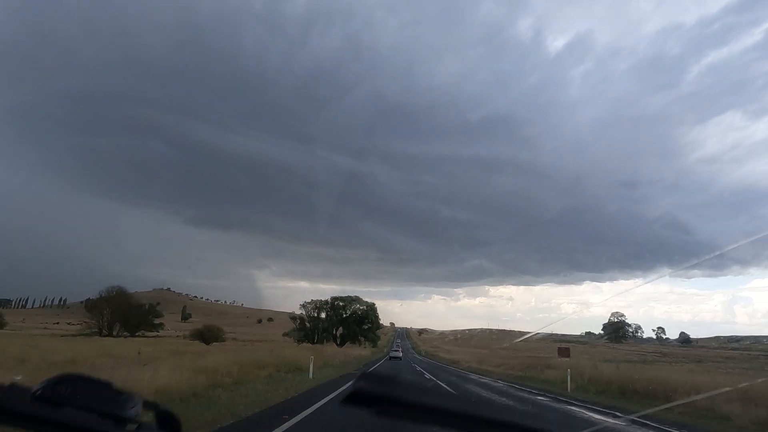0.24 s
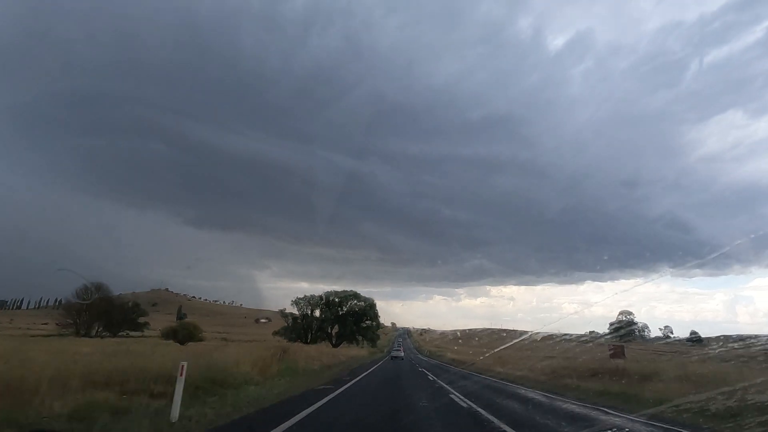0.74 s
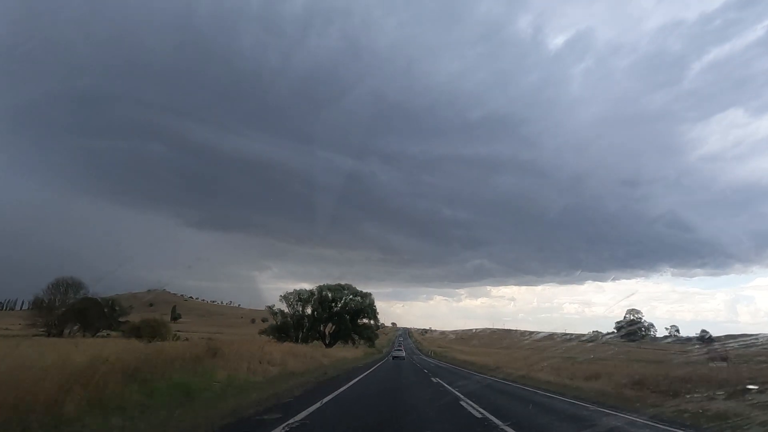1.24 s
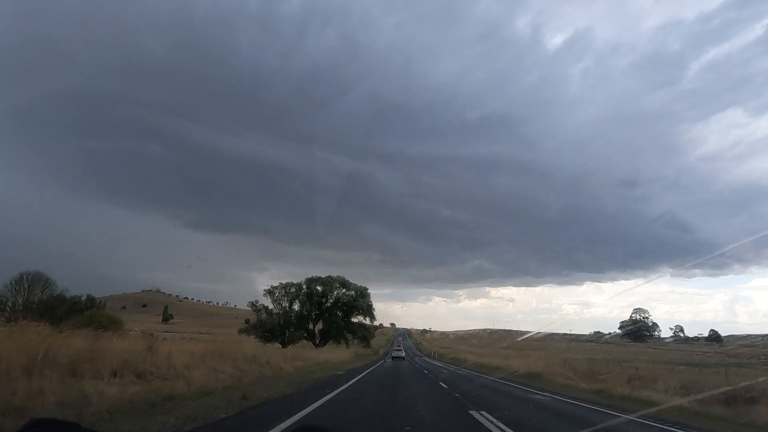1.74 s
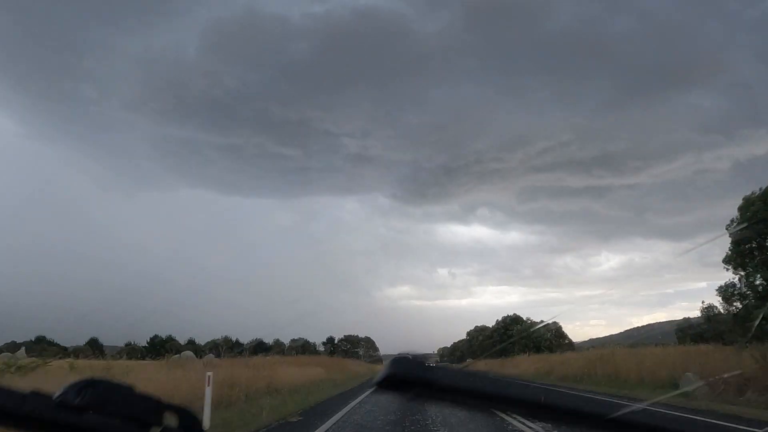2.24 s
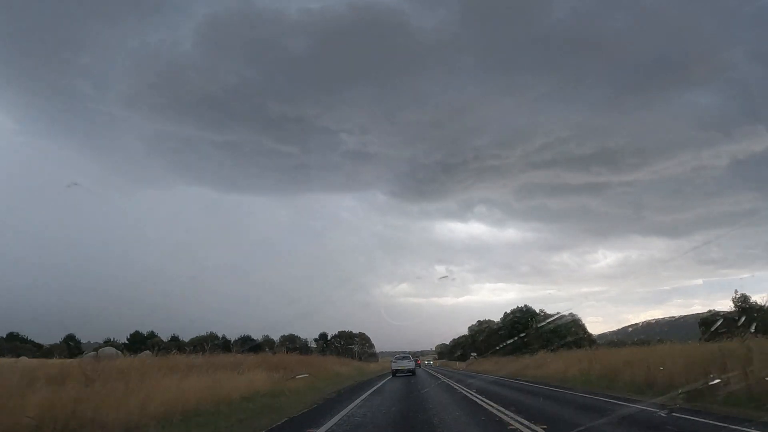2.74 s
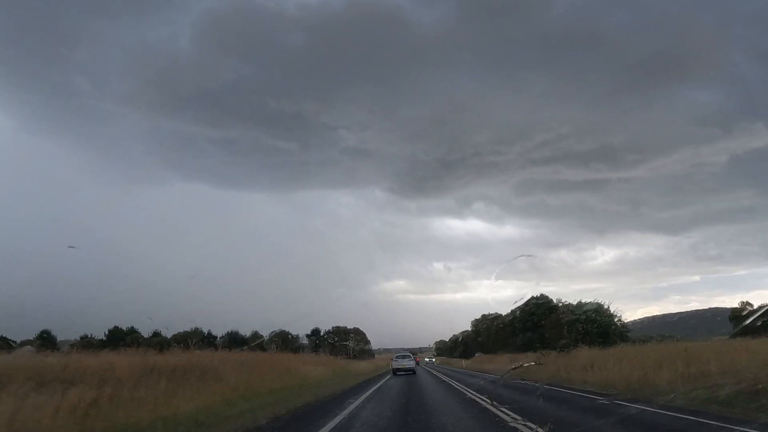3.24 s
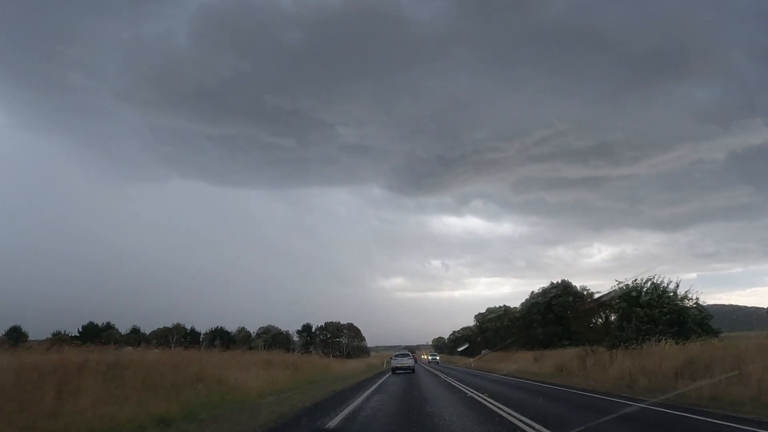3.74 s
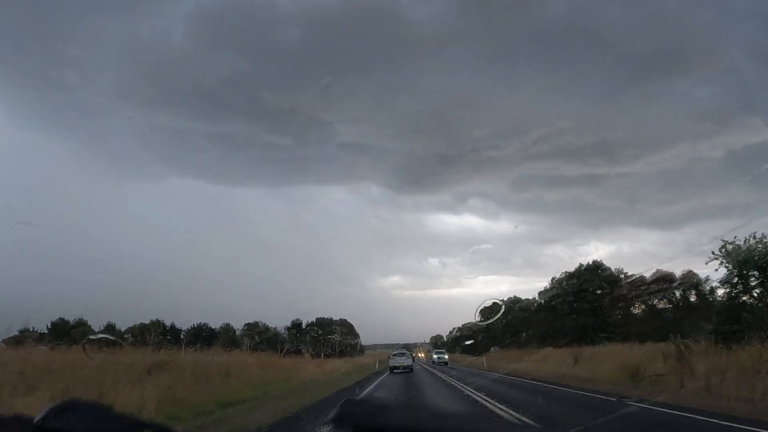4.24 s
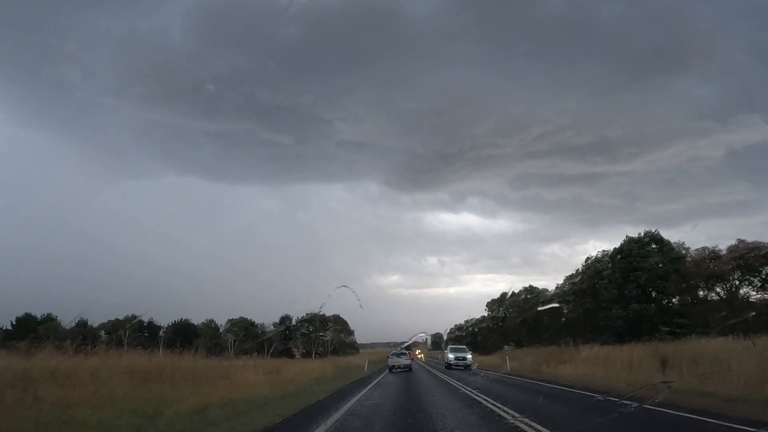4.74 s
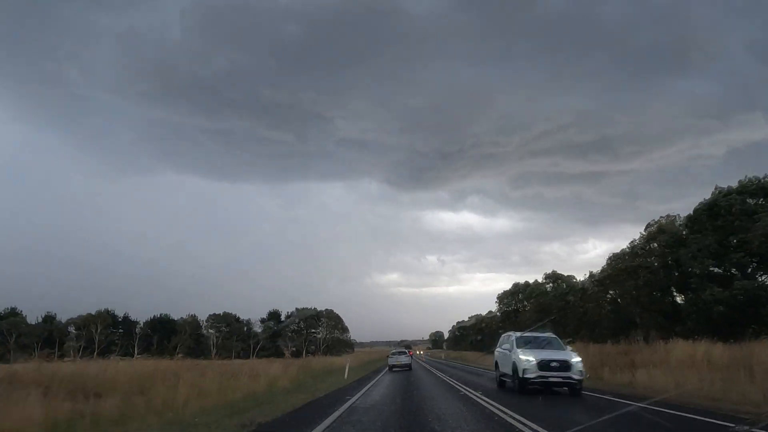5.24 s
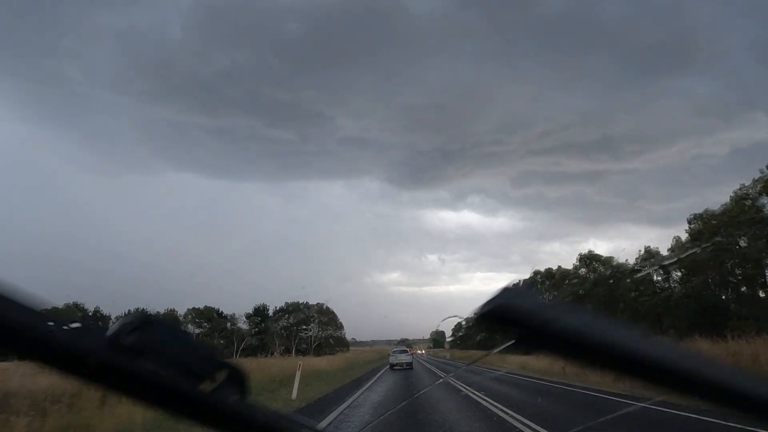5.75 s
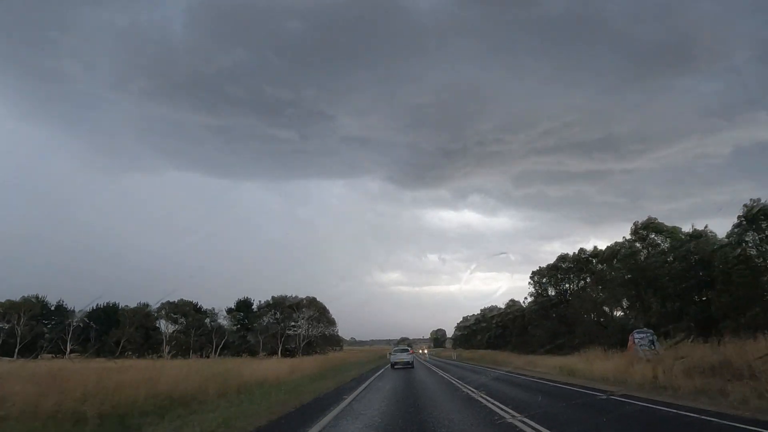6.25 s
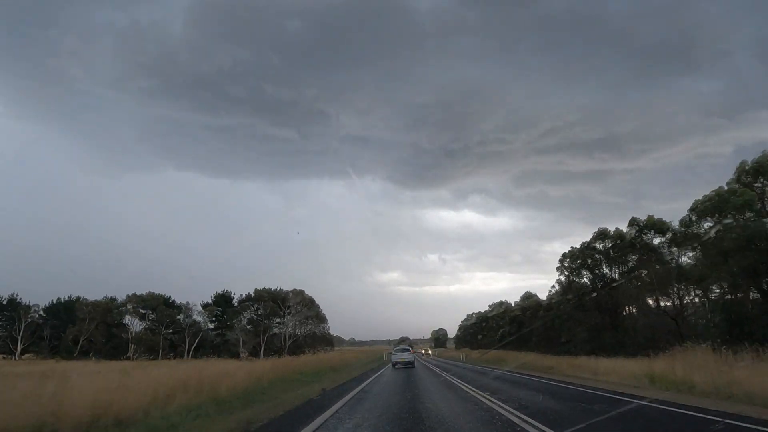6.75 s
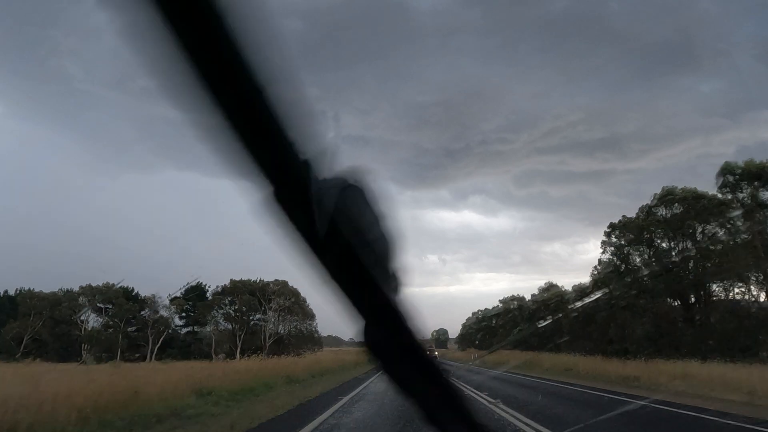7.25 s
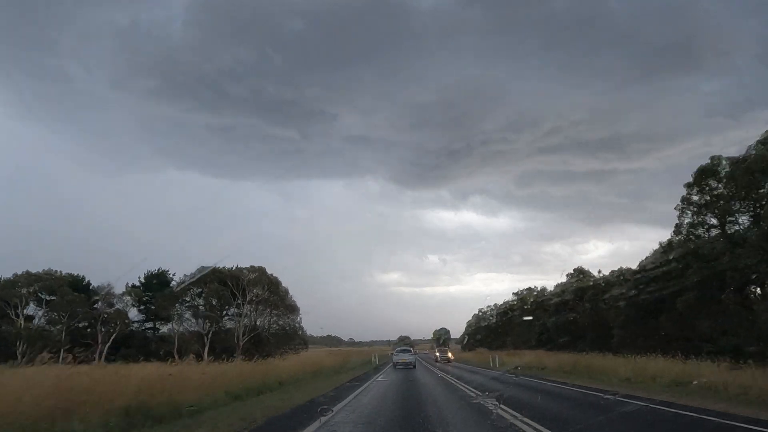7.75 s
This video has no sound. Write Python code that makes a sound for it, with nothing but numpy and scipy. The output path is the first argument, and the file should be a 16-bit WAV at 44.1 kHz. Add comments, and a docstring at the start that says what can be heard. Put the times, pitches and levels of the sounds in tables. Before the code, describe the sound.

Inside a car at highway speed, deep cabin boom and tyre roar continue as sparse raindrops on the windscreen thicken into a gusty, crackling patter.

```python
"""Cabin boom and tyre roar at highway speed: resonant noise, with a two-note tyre drone and a growing hum.
Rain taps the windscreen, sparse at first, then a thick patter in flurries: filtered clicks with short echoes
over a noise wash. One thin double tick near 2.1 s; an oncoming car, Doppler-bent noise, swishes by near 5.7 s.
A limiter ducks the highest peaks."""
import sys
import numpy as np
from scipy import signal
from scipy.fft import rfft, irfft, next_fast_len
from scipy.io import wavfile
from scipy.ndimage import uniform_filter1d, minimum_filter1d, map_coordinates

SR = 44100
rng = np.random.default_rng(int(sys.argv[2]) if len(sys.argv) > 2 else 0)


def store_wav(level_fs):
    """Save 16-bit WAV to argv[1]."""
    pcm = np.round(np.clip(np.atleast_2d(level_fs), -1, 1) * 32767)
    wavfile.write(sys.argv[1], SR, pcm.T.astype(np.int16))


N = 352800

# road noise: time_s, boom_db, roar_db
ROAD_LEVELS = [(0, -12.5, -26.5), (1.1, -12.5, -26.5), (2.05, -10.5, -25.5), (2.25, -9, -25),
               (4.6, -9.5, -24), (8, -9.5, -24.5)]
# cabin air and panel resonances: centre_hz, width_hz, level_db
CABIN_MODES = [(25, 12, -3.5), (43.1, 9.6, 0.5), (93.1, 20, -7), (118.9, 21, -2.5), (173.4, 15.9, -10.5),
               (218.5, 5.7, -13.5)]
# broad rumble spectrum: freq_hz, density_db
RUMBLE_SPECTRUM = [(8, -17), (20, 0), (60, -4), (130, -10), (160, -14.5), (260, -19), (400, -44.5),
                   (2500, -130)]
# tyre roar spectrum: freq_hz, density_db
TYRE_SPECTRUM = [(150, -18.5), (270, -5.5), (365, 2), (410, -3), (460, -10.5), (650, -12), (740, -18.5),
                 (900, -14), (1170, -16), (1400, -21.5), (1900, -31), (4000, -42), (8000, -52),
                 (16000, -84)]
# narrow resonances of doors and side windows: centre_hz, lift_db
PANEL_MODES = [(655, 3), (915, 0.5), (1035, 4.5), (1174, 3.5), (1262, 3.5)]
# likeness of the two microphones: freq_hz, likeness_0_to_1
STEREO_LIKENESS = [(70, .9985), (160, .992), (350, .95), (700, .83), (1400, .76), (8000, .5)]
# channel balance: freq_hz, left_minus_right_db
STEREO_LEAN = [(150, 0), (350, -.4), (650, -3.1), (1200, -2.5), (2500, 0)]
# tyre drone surging with the road surface: time_s, drone_db
DRONE_LEVELS = [(0, -34.5), (2, -39), (2.2, -23.5), (2.75, -42), (3.35, -25.5), (3.85, -42), (4.5, -24.5),
                (5.5, -34.5), (7, -27), (8, -40)]
# heaviest drops: start_s, level_db, treble_share_db
HEAVY_DROPS = [(0.174, -27, -34.5), (0.2255, -22, -32), (0.2593, -23, -31), (0.3127, -22.5, -29),
               (0.397, -21.5, -35), (0.4734, -20, -31), (0.742, -22, -36), (0.8113, -28, -15),
               (1.069, -21.5, -28), (1.295, -22, -34), (1.411, -22.5, -31), (1.4495, -24, -30),
               (1.524, -18.5, -36), (1.7883, -16, -40), (1.9925, -24.5, -31), (2.1733, -17.5, -32),
               (2.353, -19.5, -38), (2.4048, -14, -41), (2.4745, -9.5, -34), (2.489, -18, -22),
               (2.5346, -11, -22.5), (2.579, -19, -35), (2.61, -18, -30), (2.6343, -10, -36),
               (2.6594, -13, -29), (2.7247, -15, -29), (2.7652, -14.5, -44), (2.7923, -16.5, -36),
               (2.821, -18, -34), (2.8525, -23, -30), (2.8685, -12, -35), (2.8941, -9.5, -27.5),
               (3.017, -21, -46), (3.0907, -11.5, -32), (3.1109, -19, -33), (3.1396, -17, -40),
               (3.157, -13.5, -27), (3.2867, -17.5, -25), (3.3776, -13.5, -29), (3.4255, -15, -30),
               (3.563, -15.5, -22), (3.7696, -14.5, -27), (3.813, -16, -31), (3.8167, -11.5, -30),
               (3.8262, -12, -41), (3.8915, -15.5, -27), (3.9145, -16.5, -41), (3.99, -18, -34),
               (4.0695, -17, -39), (4.1786, -13, -26), (4.187, -15.5, -29), (4.4732, -20.5, -52),
               (4.5378, -18.5, -44), (4.606, -16, -31), (4.6456, -22, -31), (4.79, -19, -33),
               (4.8223, -20, -28), (4.9212, -21, -24), (4.9544, -19, -55), (4.9817, -20, -33),
               (5.182, -16.5, -35), (5.248, -19, -40), (5.389, -12.5, -35), (5.442, -12, -31.5),
               (5.4916, -19.5, -31), (5.6116, -21, -45), (5.738, -18.5, -25), (5.761, -20, -37),
               (5.8786, -16, -52), (5.895, -14.5, -38), (6.081, -17, -34), (6.1187, -16, -42),
               (6.271, -18.5, -54), (6.3724, -12.5, -30), (6.539, -15, -41), (6.682, -16.5, -58),
               (6.7476, -22, -43), (6.796, -17.5, -27), (6.817, -17, -30), (6.8479, -12, -31),
               (6.9061, -13, -16), (6.9475, -10, -29), (6.9585, -22, -37), (7.0348, -14, -41),
               (7.084, -18, -31), (7.1121, -18.5, -38), (7.2513, -13.5, -34), (7.2696, -12.5, -34),
               (7.395, -12, -34), (7.47, -14, -34), (7.523, -19.5, -12), (7.5378, -17, -28),
               (7.5668, -20, -29), (7.6883, -17.5, -26), (7.73, -13.5, -26), (7.8027, -12.5, -31),
               (7.9467, -15.5, -43), (7.9906, -15, -32)]
# shower strength in squalls and lulls: time_s, strength_db
SHOWER_STRENGTH = [(0.0, -49.5), (0.3, -48.5), (0.55, -53), (1.0, -52), (1.54, -46.5), (1.64, -53),
                   (1.76, -45), (1.92, -55), (2.06, -53), (2.14, -45), (2.82, -42.5), (3.44, -42.5),
                   (3.64, -51), (3.84, -40), (3.96, -44), (4.16, -37.5), (4.4, -44.5), (4.62, -41),
                   (4.92, -39), (5.12, -47.5), (5.3, -41), (5.75, -42.5), (6.02, -47), (6.52, -39),
                   (6.63, -47), (6.83, -38), (7.0, -43), (7.2, -50), (7.36, -40), (7.84, -47), (8.0, -40)]
# rain on glass spectrum: freq_hz, density_db
GLASS_SPECTRUM = [(300, -41.5), (900, -9.5), (1900, -8), (2400, -4.5), (3000, 0.5), (3700, -2), (4300, -6),
                  (5200, -7.5), (7000, -15.5), (9500, -25), (11000, -34.5), (12200, -31), (13200, -43.5),
                  (16000, -47)]
# cabin's answer to a tap, near surfaces, then whole space: gain, t60_s
CABIN_ECHOES = [(.72, .009), (.52, .05)]
# double tick spectrum: freq_hz, density_db
TICK_SPECTRUM = [(200, 0), (500, 4), (1000, 3), (3000, 3), (5200, 2), (7000, -13), (11000, -22),
                 (16000, -22)]
# engine's pull: time_s, hum_db
ENGINE_PULL = [(0, -33.5), (4, -29.5), (5.5, -24.5), (8, -18.5)]
# passing car spectrum: freq_hz, density_db
SWISH_SPECTRUM = [(300, -29.5), (650, -2.5), (920, 0.5), (1220, -4.5), (1450, -12), (8000, -61)]

TOP_HZ = 16500
USUAL_TREBLE_DB = -29.5  # treble share of an ordinary drop
HEAVIEST_DB = 7  # cap on a patter drop, over an average one
THICKEN = 0.9  # drop density, dB per dB of shower strength


def amp(db):
    """Decibels to gain."""
    return 10 ** (np.asarray(db) / 20)


def unit(x):
    """Scale to rms 1."""
    return x / np.sqrt(np.mean(x ** 2) + 1e-20)


def along(points, hz):
    """Read freq_hz, value points on a log axis."""
    point_hz, value = np.transpose(points)
    return np.interp(np.log(hz + 1), np.log(point_hz + 1), value)


def curves(rows):
    """Interpolate each column after the time to one value per sample."""
    time_s, *columns = np.transpose(rows)
    return [np.interp(np.arange(N) / SR, time_s, column) for column in columns]


def wobble(knots_per_s):
    """Smooth random curve: a spline through normal random knots."""
    knots = rng.standard_normal(int(N * knots_per_s / SR) + 4)
    return map_coordinates(knots, [np.arange(N) * knots_per_s / SR])


def filtered(x, response):
    """Apply a response of frequency through the FFT."""
    size = next_fast_len(N + SR // 2)
    return irfft(rfft(x, size) * response(np.fft.rfftfreq(size, 1 / SR)), size)[..., :N]


def causal(gain):
    """Minimum-phase response with this gain: sharp front, then ring."""
    cepstrum = irfft(np.log(np.maximum(gain, 1e-6)))
    half = len(cepstrum) // 2
    return np.exp(rfft(np.r_[cepstrum[0], 2 * cepstrum[1:half], np.zeros(half)]))


def spectrum_gain(spectrum):
    """Turn a spectrum table into a gain function of frequency."""
    return lambda hz: amp(along(spectrum, hz))


def add(track, start_s, sound):
    """Mix a stereo sound in from start_s."""
    start = int(np.clip(start_s * SR, 0, N - 1))
    track[:, start:start + sound.shape[1]] += sound[:, :N - start]


def rush(colour, width_hz=20):
    """Stereo cabin noise of rms 1: panels ring in it; near mono in the bass, wider above."""
    def mid_side_gain(hz):
        lift_db = sum(db * np.exp(-((hz - centre_hz) / width_hz) ** 2) for centre_hz, db in PANEL_MODES)
        angle = np.arccos(np.clip(along(STEREO_LIKENESS, hz), 0, 1)) / 2
        return colour(hz) * amp(lift_db) * np.array([np.cos(angle), np.sin(angle)])

    def lean_gain(hz):
        return amp(np.outer([.5, -.5], along(STEREO_LEAN, hz)))

    mid, side = filtered(rng.standard_normal((2, N)), mid_side_gain)
    return unit(filtered(np.array([mid + side, mid - side]), lean_gain))


def road():
    """The road shakes the cabin's resonances; the tread roars above them."""
    def modes(hz):
        power = sum(amp(db) ** 2 / (1 + ((hz - centre_hz) / width_hz) ** 2 * 2) ** 2
                    for centre_hz, width_hz, db in CABIN_MODES)
        return np.sqrt(power)

    boom_db, roar_db = curves(ROAD_LEVELS)
    boom = unit(rush(modes) + amp(-2.5) * rush(spectrum_gain(RUMBLE_SPECTRUM)))
    roar = rush(spectrum_gain(TYRE_SPECTRUM))
    return amp(boom_db) * boom + amp(roar_db) * roar


def drop(spectrum, tilt_db_per_octave, spot_db=3.0, spread_db=2.0, crest_db=8.0, size=2048):
    """One stereo tap, peaking near 1: glass clicks, dashboard echoes, cabin rings out."""
    hz, t = np.fft.rfftfreq(size, 1 / SR), np.arange(size) / SR
    octaves = np.log2(np.maximum(hz, 500) / 3000)
    # each spot on the glass favours other bending waves
    spot = np.interp(octaves, np.linspace(-3, 3, 16), rng.standard_normal(16))
    tilt_db = tilt_db_per_octave * np.clip(octaves, 0, 1.5)
    click = causal(amp(along(spectrum, hz) + tilt_db + spot_db * spot))
    paths = np.zeros((2, size))
    # direct sound leans to one side
    paths[:, 0] = amp(np.array([1, -1]) * spread_db * rng.standard_normal())
    # dashboard copy, 1.2-2 ms later
    paths[:, int(rng.uniform(.0012, .002) * SR)] = 0.54
    for gain, t60_s in CABIN_ECHOES:
        shared, separate = rng.standard_normal(size), rng.standard_normal((2, size))
        echoes = (0.62 * shared + separate) * amp(-60 * t / t60_s)
        paths += gain * unit(echoes) / np.sqrt(size)
    tap = irfft(rfft(paths) * click)
    power = uniform_filter1d(tap.mean(0) ** 2, size=88, mode="constant").max()  # loudest 2 ms
    return tap * amp(-crest_db) / np.sqrt(power)


def big_drops(tilt_share=0.74, splash_db=-11.0, splash_tilt_db=2, splashes=2):
    """Heavy drops stand out of the patter; weaker, mostly brighter splashes land a moment later."""
    track = np.zeros((2, N))
    for start_s, level_db, treble_db in HEAVY_DROPS:
        tilt_db = tilt_share * (treble_db - USUAL_TREBLE_DB)
        add(track, start_s, amp(level_db) * drop(GLASS_SPECTRUM, tilt_db))
        for delay_s in rng.uniform(0.002, 0.008, splashes):
            gain = amp(level_db + splash_db + 2 * rng.standard_normal())
            splash = drop(GLASS_SPECTRUM, tilt_db / 2 + splash_tilt_db)
            add(track, start_s + delay_s, gain * splash)
    return track


def patter(flurry, per_second=130, scatter_db=7, gain_db=13.5, tilt_db=-1.3, hardness_db=4,
           harden=.04, count=128):
    """Small drops land in flurries: a stronger shower brings more, bigger and harder ones."""
    shower_db, = curves(SHOWER_STRENGTH)
    squall_db = shower_db - shower_db.mean()
    # bank of taps, soft to hard; harder is brighter
    taps = [drop(GLASS_SPECTRUM, tilt_db + hardness_db * hard) for hard in np.linspace(-1, 1, count)]
    density = amp(THICKEN * squall_db)
    arrivals = np.cumsum(density * flurry) * per_second / SR
    chance = rng.random((int(arrivals[-1]), 3))
    track = np.zeros((2, N))
    for k, (when, weight, spot) in enumerate(chance):
        i = min(np.searchsorted(arrivals, k + 2 * when - .5), N - 1)
        size_db = min(scatter_db * (-np.log(weight) - 1), HEAVIEST_DB)  # many light, few heavy
        hardness = spot ** (10 ** (-harden * squall_db[i]))  # 0-1, higher in a squall
        gain = amp(shower_db[i] + gain_db + size_db) / np.sqrt(density[i])
        add(track, i / SR, gain * taps[int(hardness * (count - 1))])
    return track


def spray(flurry, db=-7.5):
    """The finest droplets merge into a soft noise wash that swells and thins with the flurries."""
    shower_db, = curves(SHOWER_STRENGTH)
    return amp(shower_db + db) * flurry * rush(spectrum_gain(GLASS_SPECTRUM))


def tick(start_s=2.0772, gap_s=0.0012, level_db=-11.5):
    """One thin double tick, its spectrum broader than the drops'."""
    track = np.zeros((2, N))
    for hit_s in (start_s, start_s + gap_s):
        add(track, hit_s, amp(level_db) * drop(TICK_SPECTRUM, 0, spot_db=-2))
    return track


def drone(low_hz=240.2, upper_hz=362, upper_db=-5.5):
    """Two hollow tyre notes waver in pitch and surge together; the upper wavers more."""
    def note(hz, waver):
        phase = 2 * np.pi * np.cumsum(hz * (1 + waver * wobble(20))) / SR
        return np.sin(phase) * amp(1.7 * wobble(10))

    drone_db, = curves(DRONE_LEVELS)
    return amp(drone_db) * (note(low_hz, .008) + amp(upper_db) * note(upper_hz, .03))


def engine(hum_hz=91.56, drift=0.007):
    """The firing note, a sine, wanders a little and grows as the car pulls."""
    hum_db, = curves(ENGINE_PULL)
    phase = 2 * np.pi * np.cumsum(hum_hz * (1 + drift * wobble(3.053))) / SR
    return np.sqrt(2) * amp(hum_db + 0.42 * wobble(2.7)) * np.sin(phase)  # sqrt(2): hum_db is rms


def oncoming(abreast_s=5.705, passing_s=0.09, level_db=-26.5, doppler=.12):
    """Another car's tyres swell and sink in pitch as it goes by, louder on the right."""
    t = np.arange(N) / SR - abreast_s
    nearness = 1 / np.sqrt(1 + (t / passing_s) ** 4)
    # travel time shrinks, then grows
    sent = np.arange(N) - doppler * np.hypot(t, passing_s) * SR
    noise = rush(spectrum_gain(SWISH_SPECTRUM))
    swish = np.array([map_coordinates(channel, [sent], mode="mirror") for channel in noise])
    return amp(level_db) * nearness * swish * amp([[-1.2], [1.2]])


def scene():
    """Road, rain, engine and traffic as heard behind the windscreen."""
    flurry = amp(3.2 * wobble(45))
    rain = big_drops() + patter(flurry) + spray(flurry)
    return road() + rain + tick() + drone() + engine() + oncoming()


def record(dry, ceiling=0.93, hold_s=0.044):
    """A look-ahead limiter ducks the highest peaks; a steep low-pass limits the band."""
    needed = np.minimum(1, ceiling / (np.abs(dry).max(0) + 1e-9))
    span = max(int(hold_s * SR), 2)
    gain = minimum_filter1d(needed, span)
    gain = uniform_filter1d(uniform_filter1d(gain, span // 2), span // 2)
    low_pass = signal.butter(N=16, Wn=TOP_HZ, fs=SR, output="sos")
    return signal.sosfiltfilt(low_pass, dry * gain)


dry = scene()
out = record(dry)
store_wav(out)
```